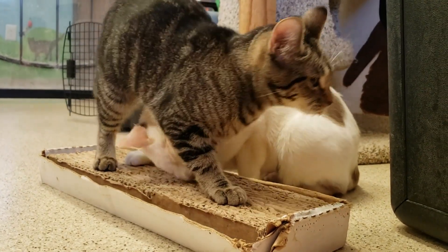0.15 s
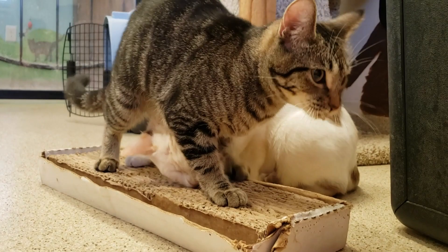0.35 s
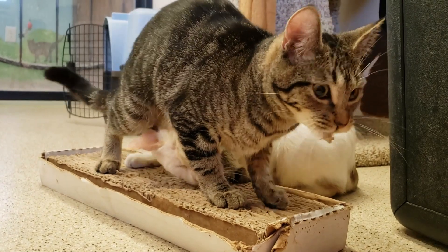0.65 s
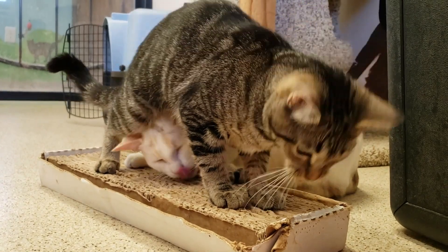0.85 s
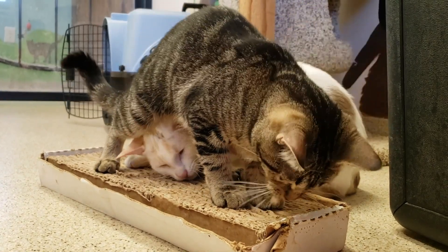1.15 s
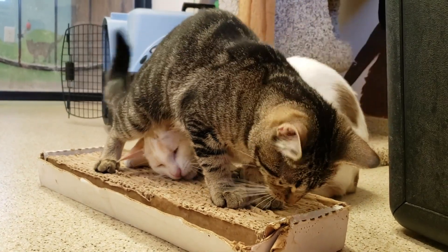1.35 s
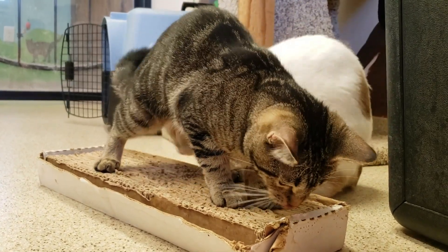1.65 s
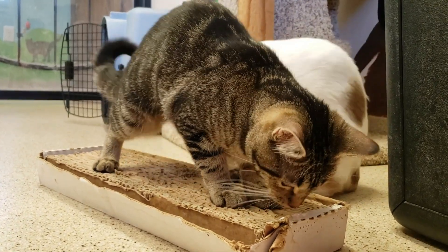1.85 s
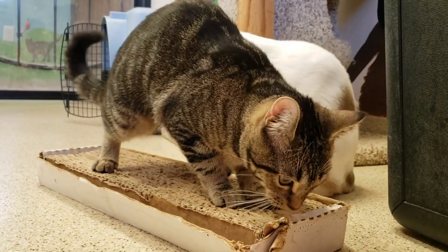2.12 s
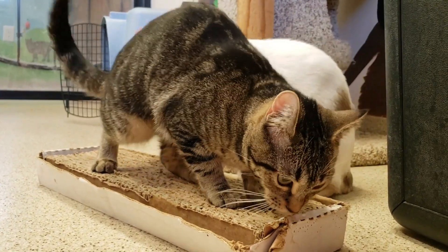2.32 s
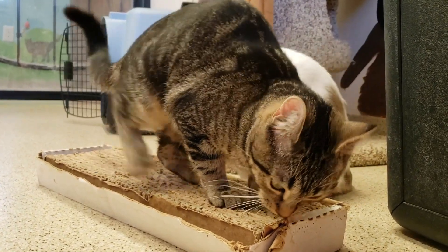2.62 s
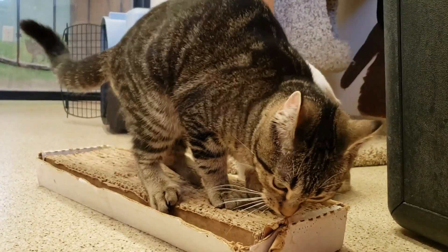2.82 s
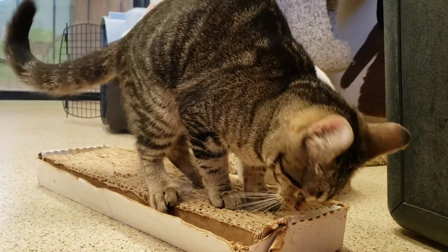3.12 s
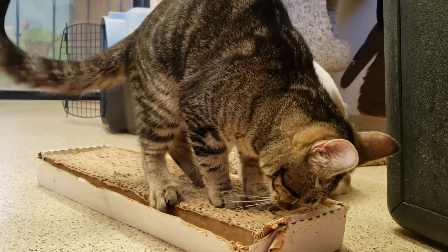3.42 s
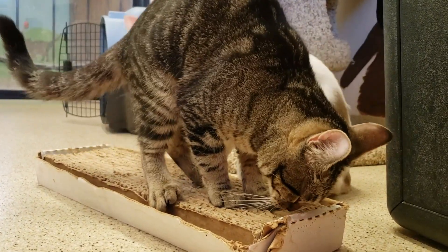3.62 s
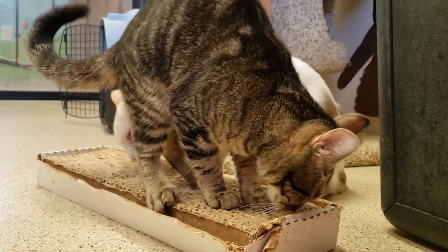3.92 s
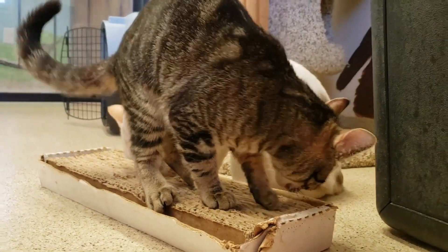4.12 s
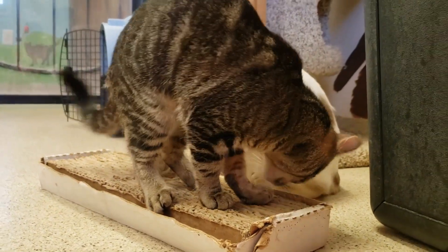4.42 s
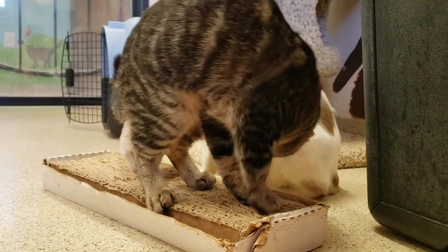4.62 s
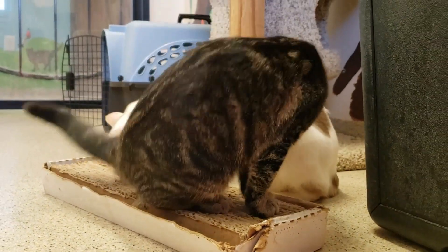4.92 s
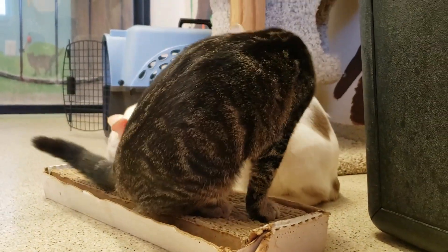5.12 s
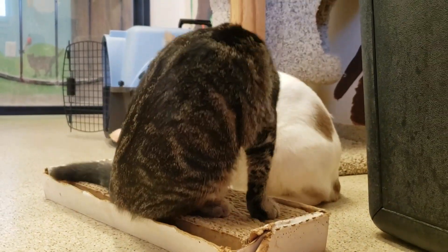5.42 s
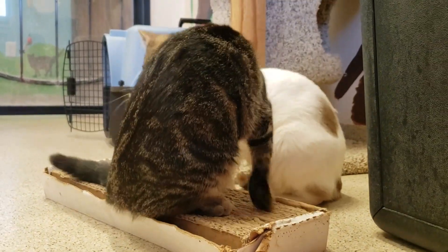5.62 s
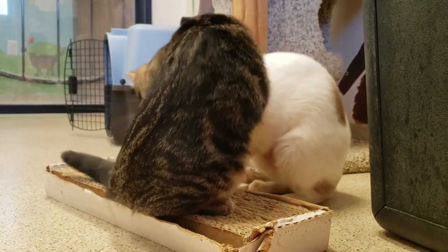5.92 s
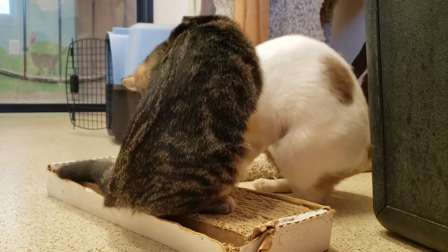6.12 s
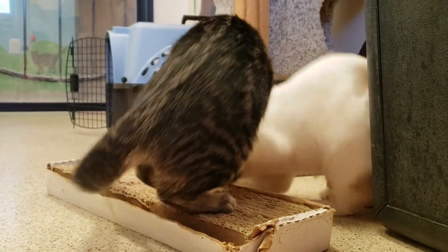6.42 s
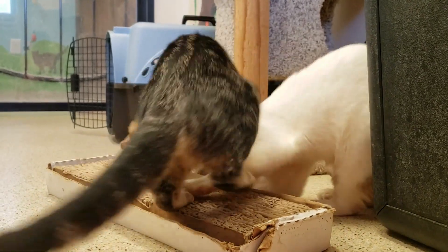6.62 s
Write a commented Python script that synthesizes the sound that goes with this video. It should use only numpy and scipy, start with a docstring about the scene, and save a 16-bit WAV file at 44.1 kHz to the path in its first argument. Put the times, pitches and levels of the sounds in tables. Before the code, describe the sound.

A quiet room with a low ventilation hum; a kitten softly treads and rubs on corrugated cardboard, then claws snap sharply free and paws scuff away.

```python
"""Small hard room, close by a corrugated cardboard scratcher on a hollow tray, two microphones.
A kitten treads on the card, rubs its cheek along it, snags its claws and steps off.
Pads scuff the paper flutes (coloured random grains), fur hisses (coloured noise), and claws snap free:
bursts of noise that ring a flute and the tray's modes. Stray fibres tick.
Ventilation hums in filtered noise and wavering tones; a far clock ticks in soft swells of noise."""
import sys
import numpy as np
from scipy import signal
from scipy.fft import rfft, irfft
from scipy.io import wavfile
from scipy.ndimage import uniform_filter1d, map_coordinates

SR = 44100
rng = np.random.default_rng(int(sys.argv[2]) if len(sys.argv) > 2 else 0)


def to_wav(s):
    """Save 16-bit WAV."""
    ch = np.atleast_2d(s).T  # columns
    pcm = np.round(np.clip(ch, -1, 1) * 32767)  # PCM
    wavfile.write(sys.argv[1], SR, pcm.astype(np.int16))


N = 298116
T = np.arange(N) / SR

# cheek rubbing along the card: t/s, relative level/dB
CHEEK_RUB = [(3.82, -91), (3.834, -89.5), (3.974, -63), (4.066, -61), (4.334, -71), (4.546, -64.5),
             (4.686, -69.5), (4.75, -63)]


def undb(db):
    """Amplitude gain of a level in dB."""
    return 10 ** (np.asarray(db) / 20)


def unit(x):
    """Scale to rms 1."""
    return x / np.sqrt(np.mean(x ** 2))


def pan(left_db):
    """Gains of the two channels, the left one louder by left_db."""
    return undb(np.array([[left_db], [-left_db]]) / 2)


def curve(rows, column):
    """Smoothed gain from a dB column, practically silent outside its span."""
    s, db = np.transpose(rows)[[0, column]]
    level_db = np.interp(T, s, db, left=-120, right=-120)
    return uniform_filter1d(undb(level_db), 400)


def colour(x, points):
    """Give x a spectrum that falls 20 dB per octave beyond its end points; rms 1."""
    hz, db = np.transpose(points)
    octave = np.log2(np.maximum(np.fft.rfftfreq(N, 1 / SR), 1))
    beyond = np.abs(octave - np.clip(octave, *np.log2(hz[[0, -1]])))
    gain = undb(np.interp(octave, np.log2(hz), db) - 20 * beyond)
    return unit(irfft(rfft(x) * gain, N))


def walk(rate):
    """Smooth random wander through rate knots per second, spread near 1."""
    knots = rng.standard_normal(2000)
    return map_coordinates(knots, [T * rate], order=3, mode="wrap")


def grains(rate, spread_db):
    """Paper fibres flicking free: random clicks of either sign and exponentially spread dB size."""
    size = undb(spread_db * np.minimum(rng.exponential(size=N), 4))
    return (rng.random(N) < rate / SR) * size * rng.choice([-1, 1], N)


def stroke(start_s, length_s, release_s):
    """Contact that builds up over a share of its length, holds and dies away."""
    attack_share = 0.42
    attack = np.clip((T - start_s) / (attack_share * length_s), 0, 1)
    return attack * np.exp(-np.maximum(T - start_s - length_s, 0) / release_s)


def room(x, wet_db):
    """Direct sound, floor scatter, then the walls' diffuse tail; the right microphone lies a little in shadow."""
    t60_s, scatter_db = 0.38, -3.5
    wall_echo_s = .012  # the tail is weaker until the first wall echoes
    right_lag_s = .00005  # extra travel time of the direct sound to the right microphone
    t = T[:SR // 2]
    decay = np.exp(-np.log(1000) * t / t60_s)
    tail = rng.standard_normal((2, len(t))) * decay * np.where(t < wall_echo_s, .4, 1)
    scatter = undb(scatter_db) * unit(rng.standard_normal((2, len(t))) * np.exp(-t / .002))
    response = (undb(wet_db) * unit(tail) + scatter) / np.sqrt(len(t))
    response[[0, 1], [0, round(right_lag_s * SR)]] += 1
    heard = signal.fftconvolve(x[None], response, axes=1)[:, :N]
    left, right = heard / np.linalg.norm(response[0])
    shadow = signal.lfilter(*signal.butter(1, [900, 8000], "band", fs=SR), right)
    return pan(1.5) * np.array([left, right - .4 * shadow])


def ventilation():
    """Duct rumble nearly alike at both microphones, wavering fan tones and a thin even hiss."""
    # duct rumble spectrum: f/Hz, relative level/dB
    rumble_colour = [(18, -35.5), (32, -22.5), (45, -2.5), (62, -0.5), (72, -4.5), (84, -2.5), (105, -6),
                     (132, -13.5), (160, -9), (200, -24.5), (245, -20), (290, -29), (420, -34), (600, -51)]
    # air hiss spectrum: f/Hz, relative level/dB
    hiss_colour = [(600, 2.5), (1000, 2.5), (1400, -1), (2200, 1.5), (3000, -3.5), (3700, -2.5),
                   (5500, -10), (7400, 3), (8500, -13), (11000, -4), (13500, -4), (15500, -2)]
    # fan and motor tones: f/Hz, mean level/dB before the pan
    fan_tones = [(59.5, -61), (81, -55.5), (161.5, -66), (220.7, -59), (239.5, -79.5), (259, -64.5)]
    rumble = colour(rng.standard_normal(N), rumble_colour) * undb(0.27 * walk(4.8))
    # shorter waves differ more between the two microphones
    side = unit(np.diff(colour(rng.standard_normal(N), rumble_colour), prepend=0))
    side = side * np.array([[1], [-1]])
    tones = 0
    for hz, db in fan_tones:
        level = np.sqrt(2) * undb(db + 1.22 * walk(6))
        tones = tones + level * np.sin(2 * np.pi * hz * T + .5 * walk(4.01))
    hiss = colour(rng.standard_normal((2, N)), hiss_colour)
    duct = undb(-47.0) * rumble + undb(-68.0) * side + tones
    return pan(0.93) * duct + pan(2.7) * undb(-76.0) * hiss


def fibre_ticks():
    """Now and then one bent fibre lets go: a tiny bright tick of fast-decaying noise."""
    clicks = grains(rate=3, spread_db=-0.5)
    t = T[:SR // 100]
    flick = rng.standard_normal(len(t)) * np.exp(-t / 0.00067)
    bright = signal.butter(1, [5000, 13000], "band", fs=SR, output="sos")
    ticks = signal.sosfilt(bright, signal.fftconvolve(clicks, flick)[:N])
    return undb(-55) * room(ticks, wet_db=-12)


def paws():
    """Pads drag over the flutes: coarse slips sound the tray, fine ones rustle the paper, weight rocks the box."""
    # paw strokes: t/s, length/s, relative pressure level/dB, relative rustle level/dB
    scuffs = [(0.386, .12, -64, -69.5), (0.874, 0.04, -65.5, -71), (0.914, .14, -68, -66.5),
              (1.517, 0.088, -62.5, -72), (1.567, 0.27, -83.5, -72.5), (1.96, 0.26, -84, -72.5),
              (2.113, 0.067, -66, -68.5), (2.566, 0.032, -59, -57), (2.725, .16, -83, -71),
              (3.819, 0.11, -97, -68.5), (4.065, 0.14, -60.5, -78), (4.559, 0.047, -65, -81),
              (4.701, 0.054, -53.5, -53.5), (4.795, 0.11, -54.5, -59.5), (5.677, 0.091, -67, -71.5),
              (5.935, .1, -60, -65), (6.256, 0.15, -65, -64), (6.412, 0.11, -49, -54),
              (6.53, .15, -55.5, -63), (6.691, 0.084, -51, -55.5)]
    # tray under coarse slips: f/Hz, relative level/dB
    body_colour = [(150, -25), (330, 8.5), (460, 5), (700, -2.5), (1100, 1), (1450, 0), (1900, -1),
                   (2500, -6.5), (4000, -20), (8000, -54)]
    # rustling paper: f/Hz, relative level/dB
    paper_colour = [(1200, -3), (2500, -9), (3400, 0.5), (4700, -7), (6000, 3), (7500, 10), (8500, 1.5),
                    (11000, 7.5), (15500, 0.5)]
    # box rocking under the kitten's weight: f/Hz, relative level/dB
    weight_colour = [(30, -8), (55, -2), (110, -10), (250, -22)]
    lean_db = -15.5  # the cheek's lean on the tray, against the rub level
    release_s = 0.022
    # change from start to end of each stroke: pressure eases, rustle too
    pressure_fall_db, rustle_rise_db = 4, -1.5
    pressure, rustle = undb(lean_db) * curve(CHEEK_RUB, 1), 0
    for s, length_s, pressure_db, rustle_db in scuffs:
        contact = stroke(s, length_s, release_s)
        progress = np.clip((T - s) / length_s, 0, 1) - .5
        pressure = pressure + undb(pressure_db - pressure_fall_db * progress) * contact
        rustle = rustle + undb(rustle_db + rustle_rise_db * progress) * contact
    slip = undb(2.74 * walk(70))
    body = undb(-2.0) * pressure * colour(grains(rate=1200, spread_db=2.5), body_colour)
    paper = undb(0.5) * rustle * colour(grains(rate=5000, spread_db=2.0), paper_colour)
    rocking = undb(2.5) * pressure * colour(rng.standard_normal(N), weight_colour)
    return room(body * slip, wet_db=-5) + room(paper * slip, wet_db=-6) + rocking


def clock():
    """One tick a second from far off, every second one louder, blurred by the walls into a soft swish of noise."""
    # smeared tick spectrum: f/Hz, relative level/dB
    tick_colour = [(300, -1), (480, -1), (750, -7), (1100, -2), (1400, -1), (1900, 2), (2600, -14),
                   (4500, -23), (5100, -3), (6000, -11), (7400, -6), (8500, -16), (15000, -17)]
    first_s, period_s = .408, 1.
    tick_db, tock_db = -67, -68.5  # swell peaks before the pan
    swell = 0
    for beat, s in enumerate(np.arange(first_s, T[-1], period_s)):
        # the swell starts 22 ms ahead of the beat and takes 51 ms to its peak
        age = np.maximum(T - s + 0.022, 0) / 0.051
        swell = swell + undb(tick_db if beat % 2 else tock_db) * (age * np.exp(1 - age)) ** 1.35
    return pan(4.0) * swell * colour(rng.standard_normal((2, N)), tick_colour)


def claws():
    """A claw strains and tears a few fibres: a crack, the short ring of one flute and a knock of the tray."""
    # claws snapping free: t/s, relative level/dB, flute ring f/Hz
    snap_rows = [(0.947, -59.5, 2570), (1.669, -61.5, 4500), (2.152, -55, 1510), (4.194, -42.5, 1580),
                 (4.7849, -29, 1950), (4.805, -27.5, 2020), (4.8105, -36.5, 1110), (4.8159, -24, 3270),
                 (4.832, -35, 3020), (6.6843, -37, 1200)]
    # flutes creaking under a dragged claw: t/s, relative level/dB, flute ring f/Hz, drag time/s
    creak_rows = [(2.153, -52.5, 1240, 0.0055), (2.197, -50.5, 1470, 0.0016), (2.858, -54, 1130, 0.015),
                  (3.731, -59, 1480, 0.02), (4.753, -36, 2060, .004), (5.839, -48, 430, 0.011),
                  (5.944, -43, 514, 0.009), (6.631, -31, 1900, .004)]
    # modes of the hollow tray: f/Hz, relative level/dB, t60/s
    tray_modes = [(340, -24, 0.057), (442, 12, 0.042), (505, -2.5, 0.22), (600, -30, 0.049),
                  (875, 12, 0.0093), (1170, 11.5, 0.0084), (1643, 6, 0.023), (1990, -12, 0.018),
                  (3300, -32, .015)]
    # tearing fibres: f/Hz, relative level/dB
    crack_colour = [(700, -22), (2000, -5), (3300, 3), (4700, 1), (6000, 0.5), (7600, 9), (9000, -5.5),
                    (14000, -2), (16000, 5.5)]
    t = T[:SR // 6]
    lead_s = .04  # room for the strain ahead of each tear
    knocks, cracks = np.zeros((2, N + len(t)))
    # each event: t/s, level/dB, ring f/Hz, tear time/s, crack and tray levels/dB against the flute
    events = []
    for s, db, hz in snap_rows:
        # a snap knocks the tray, the harder the lower the flute rings
        tray_db = -3 - 14 * np.log2(hz / 1950)
        events.append((s, db, hz, 0.0012, -1, tray_db))
    for row in creak_rows:
        events.append((*row, -16, -11.5))
    for s, db, hz, tear_s, crack_db, tray_db in events:
        fibres = rng.standard_normal(len(t)) * np.exp(-np.abs(t - lead_s) / tear_s)
        tray = 0
        for f, mode_db, t60 in tray_modes:
            sign = rng.choice([-1, 1])
            tray = tray + sign * undb(mode_db - 60 * t / t60) * np.sin(2 * np.pi * f * t)
        # paper damps a flute within a few cycles
        flute = t * np.sin(2 * np.pi * hz * t) * np.exp(-hz * t)
        flute, tray = (signal.fftconvolve(fibres, ring)[:len(t)] for ring in (flute, tray))
        flute, tray, fibres = (undb(db) * part / np.linalg.norm(part) for part in (flute, tray, fibres))
        start = int((s - lead_s) * SR)
        knocks[start:start + len(t)] += flute + undb(tray_db) * tray
        cracks[start:start + len(t)] += undb(crack_db) * fibres
    cracks = np.std(cracks[:N]) * colour(cracks[:N], crack_colour)
    return undb(15) * (room(knocks[:N], wet_db=-5.0) + room(cracks, wet_db=-9.5))


def fur():
    """Countless hairs slide along the card: a smooth hiss off to the left, its airy top nearly centred."""
    # hair on card: f/Hz, relative level/dB
    fur_colour = [(900, -35), (1800, -8), (2500, -2), (3400, 2.5), (4700, 0), (7400, 3), (8500, -5),
                  (11000, 0.5), (15500, 1.5)]
    rub = undb(5.5) * curve(CHEEK_RUB, 1)
    # the coat slides on as the kitten sits down
    settle = undb(-60.5) * stroke(4.75, length_s=0.097, release_s=0.079)
    # the tail then sweeps over the card once
    sweep = undb(-74.5) * np.exp(-((T - 5.35) / 0.12) ** 2)
    slide = (rub + settle + sweep) * undb(0.61 * walk(55))
    hiss = slide * colour(rng.standard_normal((2, N)), fur_colour)
    low = signal.sosfiltfilt(signal.butter(2, 8500, fs=SR, output="sos"), hiss)
    return pan(12.3) * low + pan(0.55) * (hiss - low)


def scene():
    """Sum of the room's own sounds and the kitten on the card."""
    return ventilation() + fibre_ticks() + paws() + clock() + claws() + fur()


def record(dry):
    """The phone cuts the top: a steep low-pass at 15.8 kHz."""
    return signal.sosfilt(signal.ellip(10, .2, 70, 15800, fs=SR, output="sos"), dry)


dry = scene()
out = record(dry)
to_wav(out)
```